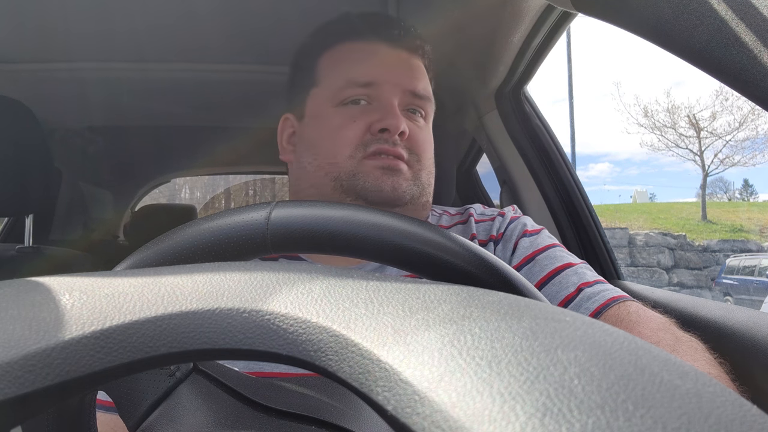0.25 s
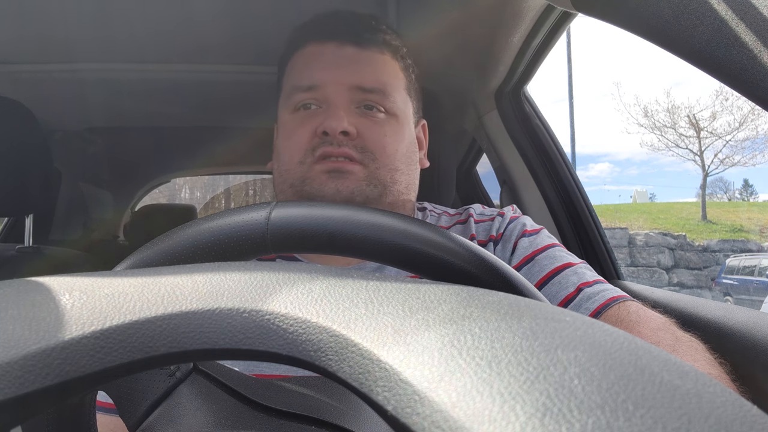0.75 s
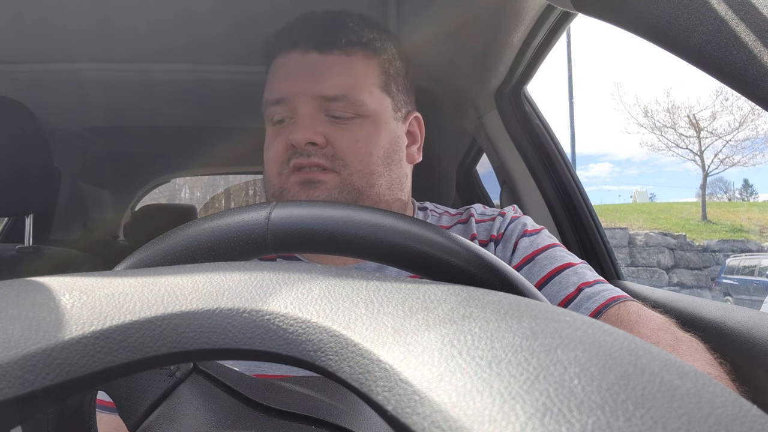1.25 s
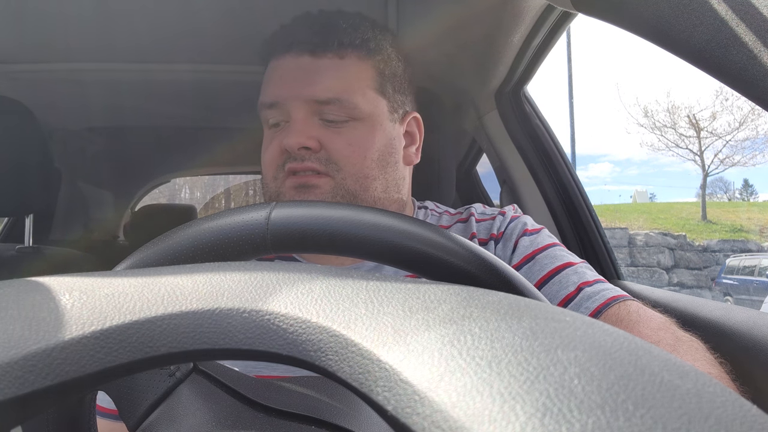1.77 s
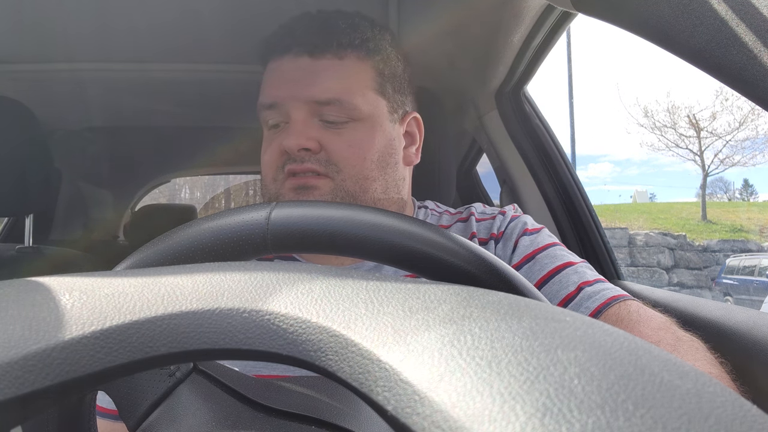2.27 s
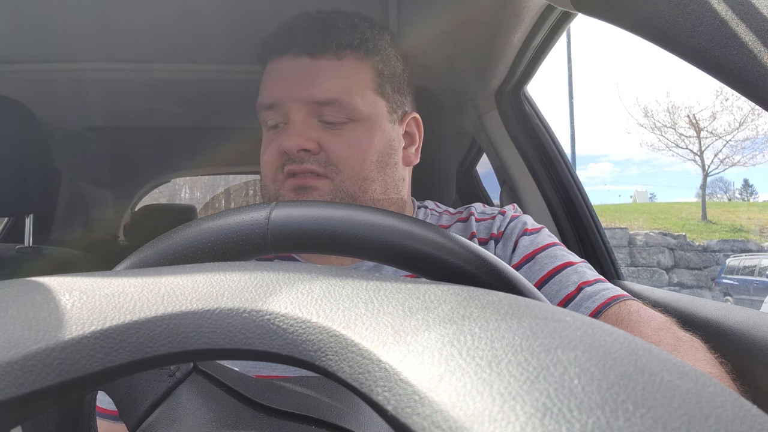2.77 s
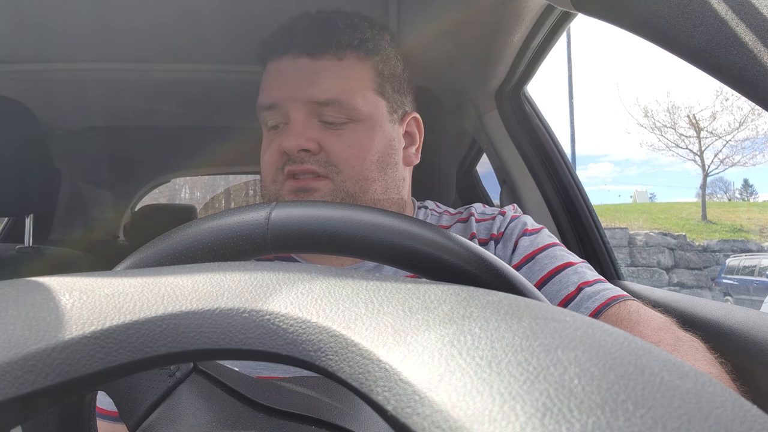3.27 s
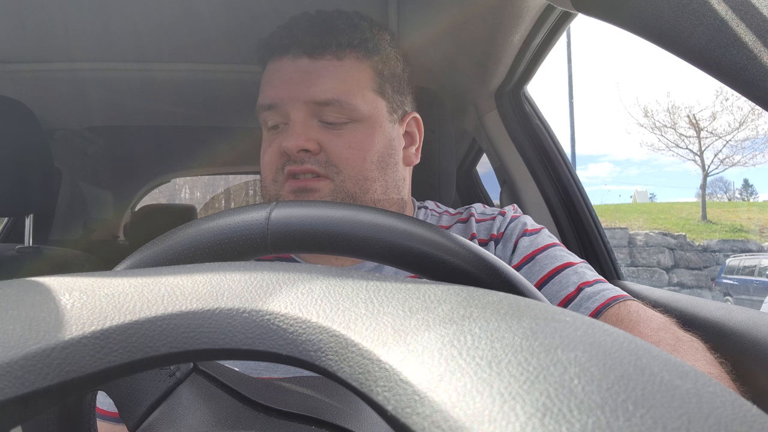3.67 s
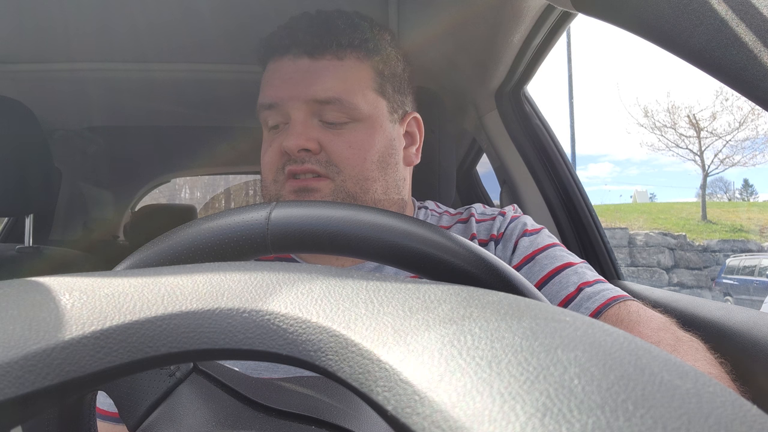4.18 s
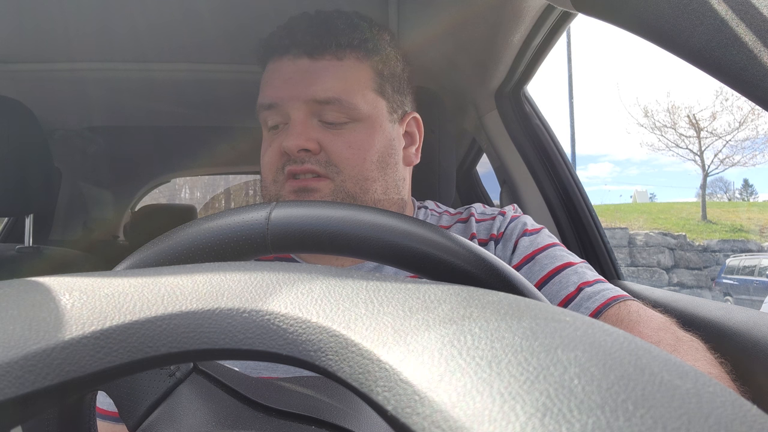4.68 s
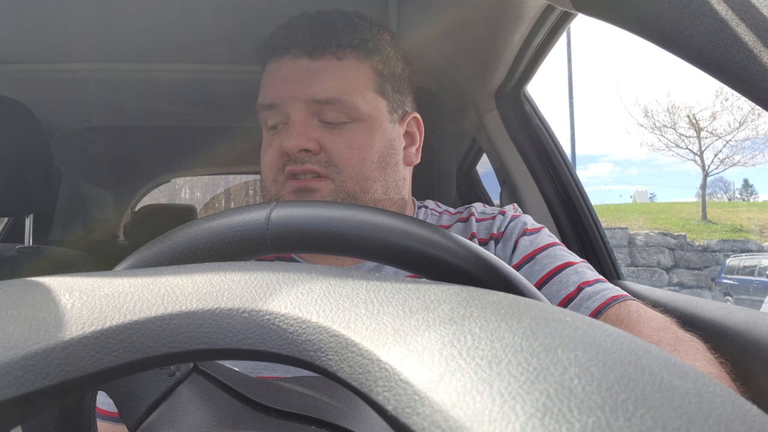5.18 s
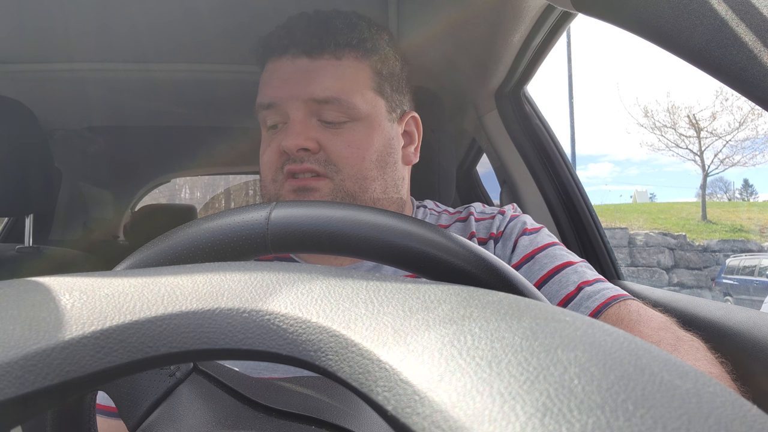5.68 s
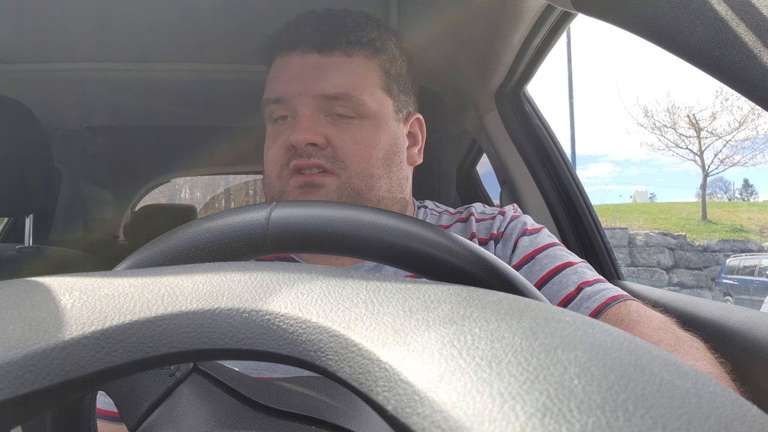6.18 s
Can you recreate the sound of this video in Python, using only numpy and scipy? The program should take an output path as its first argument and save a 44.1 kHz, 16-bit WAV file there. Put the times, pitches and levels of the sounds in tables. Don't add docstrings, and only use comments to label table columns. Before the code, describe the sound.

Air from dashboard vents buffets a stereo microphone at very close range, bassy and uneven, with a dull rush and faint hum beneath. It stays almost constant, sagging slightly. Near the end comes one hard, brief plastic click with tiny rattles after it, in a dry small car interior. The rush then drops away, leaving mainly low rumble.

```python
import sys
import numpy as np
from scipy import signal
from scipy.fft import rfft, irfft, next_fast_len
from scipy.io import wavfile
from scipy.ndimage import uniform_filter1d

SR = 44100
rng = np.random.default_rng(int(sys.argv[2]) if len(sys.argv) > 2 else 0)


def wav_record(signal):
    frames = np.transpose(np.atleast_2d(signal))
    bounded = np.clip(frames, -1, 1)
    quanta = np.round(bounded * 32767).astype(np.int16)
    wavfile.write(sys.argv[1], SR, quanta)


def level_to_linear(level):
    exponent = np.asarray(level, float) / 20
    return 10 ** exponent


N = 284048
PORT_LAG_S = 18 / 44100


def at_hz(rows, hz):
    knots_hz, *columns = np.transpose(rows)
    return [np.interp(np.log(hz), np.log(knots_hz), column) for column in columns]


def drift(rate_hz):
    r = np.exp(-80 * np.pi * rate_hz / SR)
    noise = rng.standard_normal(N // 40 + 2002)
    slow = signal.lfilter([1], [1, -2 * r, r * r], noise)[2000:]
    return np.interp(np.arange(N) / 40, np.arange(len(slow)), slow / np.std(slow))


def flow():
    t = np.arange(N) / SR
    swell_s, run_down_s, run_down_db, run_down_time_s = 4.65, 5.83, -15, 0.46
    sag_db_per_s, swell_db_per_s = 0.26, 1.46
    running_db = -1.5 - sag_db_per_s * t + swell_db_per_s * np.clip(t - swell_s, 0, run_down_s - swell_s)
    since_s = np.maximum(t - run_down_s, 0)
    return running_db + run_down_db * (1 - np.exp(-since_s / run_down_time_s))


# pitch in Hz, level in dB, wander in Hz, dB per dB of flow, right lead in rad,
# share of the rotor's slowing (0-1).
FAN_TONES = [
    (118.4, -49.5, 1.0, .1, -.2, 0),
    (839.5, -62.6, .8, .4, 1.0, 1),
]


def fan_tones(flow_db):
    coast_s, coast_time_s = 5.75, 1.7
    speed = np.exp(-np.maximum(np.arange(N) / SR - coast_s, 0) / coast_time_s)
    out = 0
    for hz, level_db, wander_hz, share, lead_rad, slowing in FAN_TONES:
        pitch_hz = hz * speed ** slowing + wander_hz * drift(1.5)
        phase = 2 * np.pi * np.cumsum(pitch_hz) / SR
        strength = np.sqrt(2) * level_to_linear(level_db + share * flow_db + .6 * drift(2.5))
        out = out + strength * np.sin([phase, phase + lead_rad])
    return out


# time in s, strength in dB, left over right in dB.
CONTACTS = [(0.702, -68, 7), (5.408, -52, 6), (5.4120, -46, 3), (5.416, -36, 0.5), (5.418, -26.5, -0.5),
            (5.422, -32.5, -1), (5.426, -36, 1), (5.4283, -37, -5), (5.432, -44, 9), (5.442, -42, 2),
            (5.4470, -40, -1), (5.4504, -55, 5.5), (5.455, -47, -6), (5.4801, -49, 0.5), (5.4850, -53, -6),
            (5.745, -66, -2), (5.770, -66, -2), (5.792, -61, -4), (5.810, -69, 1), (5.853, -64, -6),
            (5.862, -60, -6), (6.019, -76, -13)]
# pitch in Hz, width in Hz, level in dB.
HOUSING_MODES = [(720, 200, -19), (1500, 220, -4), (2320, 160, -0.5), (3090, 230, 0.5), (4140, 530, 0.5),
                 (4720, 250, 0.5), (5580, 350, -0.5), (6810, 800, -9), (8200, 610, -15),
                 (11030, 880, -11.5), (13600, 1500, -18), (15160, 1200, -21)]


def contact_pressure(rise_s, fall_s):
    t = np.arange(N) / SR
    pressure = np.zeros((2, N))
    for s, strength_db, pan_db in CONTACTS:
        near = slice(int((s - .01) * SR), int((s + .03) * SR))
        shape = np.exp(np.minimum((t[near] - s) / rise_s, (s - t[near]) / fall_s))
        pressure[:, near] += level_to_linear(strength_db + np.array([[pan_db], [-pan_db]]) / 2) * shape
    return pressure


def cabin(x):
    t60_s, tail_db, onset_s = .08, -11.5, 0.0021
    t = np.arange(int(.2 * SR)) / SR
    echoes = rng.standard_normal((2, len(t))) * level_to_linear(-60 * t / t60_s) * np.minimum(t / onset_s, 1)
    echoes = echoes / np.sqrt(np.sum(echoes ** 2, axis=1, keepdims=True))
    return x + level_to_linear(tail_db) * signal.fftconvolve(x, echoes, axes=1)[:, :N]


def switch(rise_s, fall_s, alike, dulling):
    pressure = contact_pressure(rise_s, fall_s)
    shared, *own = rng.standard_normal((3, N)) * level_to_linear(1.9 * rng.standard_normal((3, N)))
    lagged = np.roll(shared, round(PORT_LAG_S * SR))
    slips = alike * np.array([lagged, shared]) + np.sqrt(1 - alike ** 2) * np.array(own)
    slips = pressure * slips
    out = 0
    for k, (hz, width_hz, level_db) in enumerate(HOUSING_MODES):
        r = np.exp(-np.pi * width_hz / SR)
        zeros = [(1 - r * r) / 2, 0, (r * r - 1) / 2]
        poles = [1, -2 * r * np.cos(2 * np.pi * hz / SR), r * r]
        reach = (pressure / pressure.max()) ** (dulling * max(np.log2(hz / 5000), 0))
        ring = signal.lfilter(zeros, poles, slips * reach + 1e-18)
        out = out + (-1) ** k * level_to_linear(level_db) * ring
    return level_to_linear(10.0) * cabin(out)


# time in s, change in dB, length in s.
STALLS = [(0.025, -4, 0.13), (0.402, 3, 0.17), (0.718, -0.5, 0.091), (1.297, 3, 0.13), (1.548, -6.5, 0.068),
          (2.18, 4.5, 0.053), (2.334, -3.5, 0.066), (2.65, 1, 0.1), (3.483, -3, 0.092), (3.85, 3, 0.19),
          (4.11, -9, 0.051), (4.892, -8, 0.059), (5.245, 3, 0.099), (5.444, 4, 0.025), (5.6, -0.5, 0.045),
          (5.885, 3.5, 0.046)]


def stalls():
    t = np.arange(N) / SR
    return sum(change_db * np.exp(-((t - s) / length_s) ** 2) for s, change_db, length_s in STALLS)


# time in s, strength in dB, pitch in Hz, length in s.
EDDIES = [(0.23, -34.5, 69, 0.24), (0.48, -32.5, 72, 0.059), (0.712, -32, 73.3, 0.046),
          (0.952, -35, 72.3, 0.095), (1.22, -31.5, 72, 0.076), (1.384, -32, 114, 0.017),
          (1.421, -30, 64, 0.041), (1.782, -35, 76, 0.15), (1.982, -29.5, 74, 0.031),
          (2.18, -32, 151, 0.044), (2.174, -35.6, 69.5, 0.18), (2.496, -37.1, 68, 0.061),
          (2.658, -37.1, 82, 0.038), (2.83, -34, 56.6, 0.083), (3.086, -35, 61.3, 0.19),
          (3.528, -33.5, 64.7, 0.107), (3.863, -32.5, 68.5, 0.162), (4.03, -32, 85.4, 0.025),
          (4.371, -34.9, 68, 0.13), (4.66, -34, 55, 0.045), (4.752, -29.5, 80, 0.023),
          (4.853, -33.1, 59.4, 0.023), (5.11, -34.5, 57, 0.12), (5.331, -24, 59.5, 0.024),
          (5.458, -31.5, 78, 0.027), (5.66, -34.4, 65, 0.12), (5.89, -34, 85, 0.031),
          (6.035, -33.5, 62, 0.099), (6.191, -33.5, 59.6, 0.028), (6.365, -37.5, 61.6, 0.1)]
# band in Hz, level in dB.
LULL = [
    (46, -56),
    (104, -47.5),
]


def eddies():
    spread_oct = 0.58
    s, strength_db, hz, length_s = np.transpose(EDDIES)[:, :, None]
    t = np.arange(0, N + 40, 40) / SR
    swell = level_to_linear(strength_db) ** 2 * np.exp(-((t - s) / length_s) ** 2)
    levels = []
    for band_hz, lull_db in LULL:
        nearness = np.exp(-(np.log2(band_hz / hz) / spread_oct) ** 2)
        power = level_to_linear(lull_db) ** 2 + np.sum(swell * nearness, axis=0)
        levels.append(np.sqrt(np.interp(np.arange(N) / SR, t, power)))
    return levels


# Hz, left in dB per Hz, right in dB per Hz,
# left-right likeness (0-1), right lead in rad.
RUMBLE = [(15, -82, -80, .16, .6), (24, -60.5, -64.4, .82, -.4), (35, -66, -67.5, .5, -.37),
          (46, -50, -52.5, .72, -.48), (52, -51, -52.8, .72, -.33), (66, -50.5, -52.6, .62, -.19),
          (85, -53.8, -55.1, .6, -.39), (104, -57.5, -59, .66, -.42), (118, -58, -60, .75, -.48),
          (130, -64, -64.5, .6, -.52), (142, -63.5, -64.6, .67, -.45), (160, -68, -68, .71, -.38),
          (195, -68.5, -69, .72, -.47), (220, -67, -67.3, .82, -.47)]
DUCT = [(220, -67, -67, .85, -.46), (255, -67, -69.5, 0.85, -0.72), (343, -69, -69, .92, -0.71),
        (358.4, -69, -70, 0.93, 0.62), (418, -70, -76, .28, 1), (442.5, -74, -68.5, 0.9, -0.5),
        (532, -73.5, -77, 0.59, -0.68), (545, -78.5, -73.5, 0.38, -0.96), (584, -76.5, -75, 0.96, -0.24),
        (770, -75.8, -77.3, .7, -.3), (825, -80.5, -81.5, .6, .2), (935, -84, -83, .87, .62),
        (1014, -77.5, -75, 0.98, 0.44), (1083, -80.5, -88.5, 1, -1.2)]
VENT = [(1100, -81.7, -80.8, 0.67, 0.08), (1173, -88.5, -76, 0.97, -0.39), (1248, -88.5, -83, 0.68, -0.24),
        (1490, -82.5, -78, 0.43, -1.17), (1570, -79.5, -76, 0.54, -1.58), (1699, -80, -84, 0.89, -1.1),
        (1713, -79, -90, 0.82, -0.95), (1954, -92, -85.5, 0.5, -0.79), (2130, -92, -98, 0.99, 0.57),
        (2307, -90, -91, 0.5, 1), (2518, -95.5, -99.5, 0.29, -1.7), (3000, -92.5, -96, 0.62, -0.38),
        (3376, -99.7, -102.6, 0.08, 0.0), (3820, -102.5, -103.5, 0.23, 0.99)]
HISS = [(3600, -102.4, -103.4, .17, 0), (4380, -104.5, -103, 0.11, 0), (4410, -112, -110, 0.12, 0.0085),
        (5200, -112.5, -112.5, 0.2, 0), (5460, -113, -111.5, .1, 0.0049), (5770, -112, -110, 0.19, 0),
        (6370, -116, -114, .1, 0.003), (6780, -119.5, -118, .05, 0), (7500, -124, -128, .1, 0),
        (8500, -123, -126, 0.28, 0.0049), (9100, -128, -130, .1, 0.0016),
        (9500, -133, -131.5, 0.065, 0.0032), (13000, -134, -133, .04, 0.0035),
        (16000, -134, -133.5, .02, 0.0093)]
# pitch in Hz, width in Hz, dB above the hiss.
WHISTLES = [(3930, 51, 4), (5700, 70, 5), (6250, 90, 2.5), (7060, 120, 1.5), (8250, 90, 1.5)]


def port_noise(size):
    hz = np.maximum(np.arange(size // 2 + 1) * SR / size, 1)
    colour = sorted(RUMBLE + DUCT[1:] + VENT[1:] + HISS[1:])
    left_db, right_db, alike, lead_rad = at_hz(colour, hz)
    alike = np.clip(alike, 0, 1)
    ridges_db = sum(lift_db * np.exp(-((hz - at) / width_hz) ** 2) for at, width_hz, lift_db in WHISTLES)
    shared, apart = rfft(rng.standard_normal((2, size)))
    left = np.sqrt(1 + alike) * shared + np.sqrt(1 - alike) * apart
    right = np.sqrt(1 + alike) * shared - np.sqrt(1 - alike) * apart
    right = right * np.exp(1j * (lead_rad + 2 * np.pi * hz * PORT_LAG_S))
    below = np.minimum(hz / RUMBLE[0][0], 1) ** 2
    both = np.array([left * level_to_linear(left_db), right * level_to_linear(right_db)])
    return hz, both * below * level_to_linear(ridges_db) * np.sqrt(SR) / 2


# Hz, dB per dB of flow.
FLOW_SHARE = [(30, 0), (150, .3), (400, .5), (900, .68), (1500, .95), (3000, 1.25), (6000, 1.4), (9000, .7),
              (12000, .05)]


def air(flow_db, flicker_db, even_s):
    stall_hz, stall_spread_oct = 237, 1.2
    size = next_fast_len(N)
    hz, spectrum = port_noise(size)
    centres_hz = np.concatenate([[22, 46, 104, 220], 380 * 2 ** np.arange(0, 5.6, .5)])
    place = np.interp(np.log(hz), np.log(centres_hz), np.arange(len(centres_hz)))
    gust, lumps, stall_db = drift(9.2), eddies(), stalls()
    span = int(even_s * SR)
    out = 0
    for k, centre_hz in enumerate(centres_hz):
        crossfade = np.cos(np.pi / 2 * np.clip(place - k, -1, 1))
        band = irfft(spectrum * crossfade, size)[:, :N]
        if 0 < k <= len(lumps):
            power = np.mean(band, axis=0) ** 2
            smooth = uniform_filter1d(uniform_filter1d(power, span), span)
            out = out + band / np.sqrt(smooth + 0.065 * np.mean(power)) * lumps[k - 1]
        else:
            share, = at_hz(FLOW_SHARE, centre_hz)
            nearness = np.exp(-(np.log2(centre_hz / stall_hz) / stall_spread_oct) ** 2)
            band = band * level_to_linear(stall_db * nearness)
            out = out + band * level_to_linear(share * (flow_db + .15 * gust + flicker_db * drift(12.0)))
    return out


def scene():
    flow_db = flow()
    tones = fan_tones(flow_db)
    snap = switch(rise_s=0.00098, fall_s=0.0016, alike=0.6, dulling=0.62)
    return tones + snap + air(flow_db, flicker_db=.55, even_s=.07)


def top_cut(x):
    return signal.sosfilt(signal.butter(12, 16430, fs=SR, output="sos"), x)


def record(dry):
    low_pass = signal.ellip(12, .5, 60, 15700, fs=SR, output="sos")
    return top_cut(signal.sosfilt(low_pass, dry))


dry = scene()
out = record(dry)
wav_record(out)
```